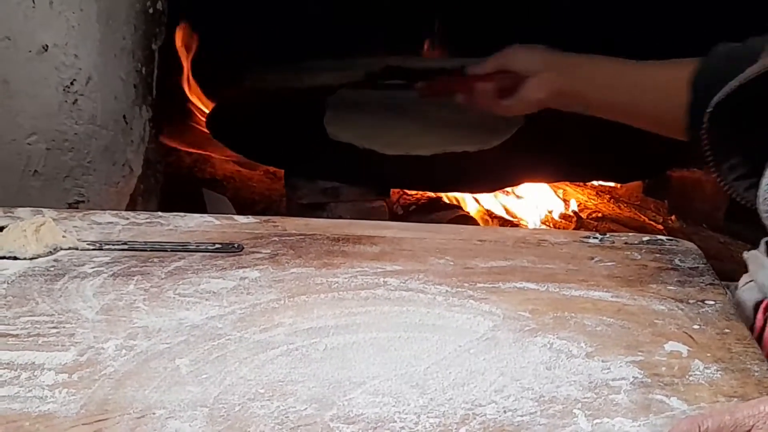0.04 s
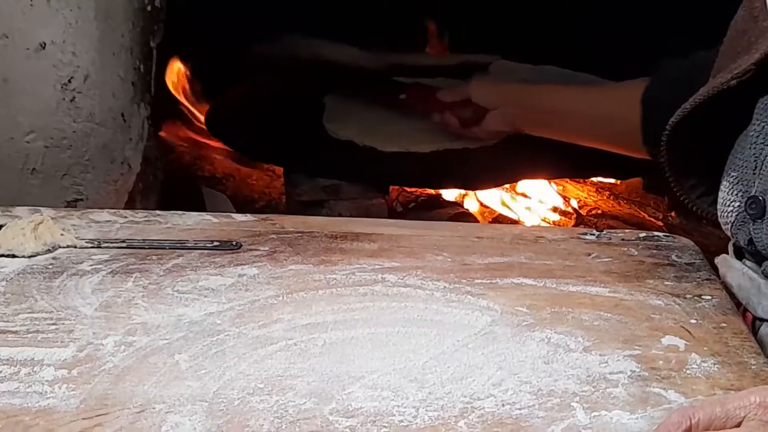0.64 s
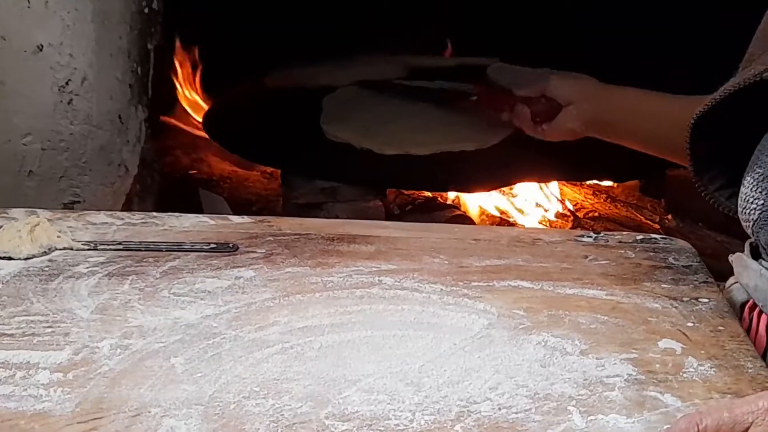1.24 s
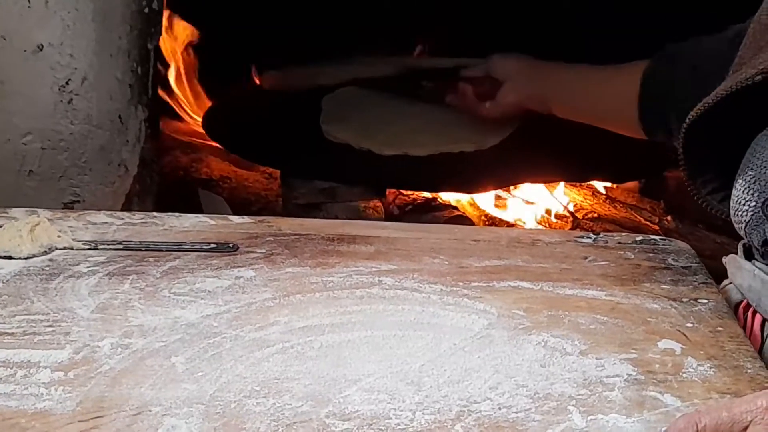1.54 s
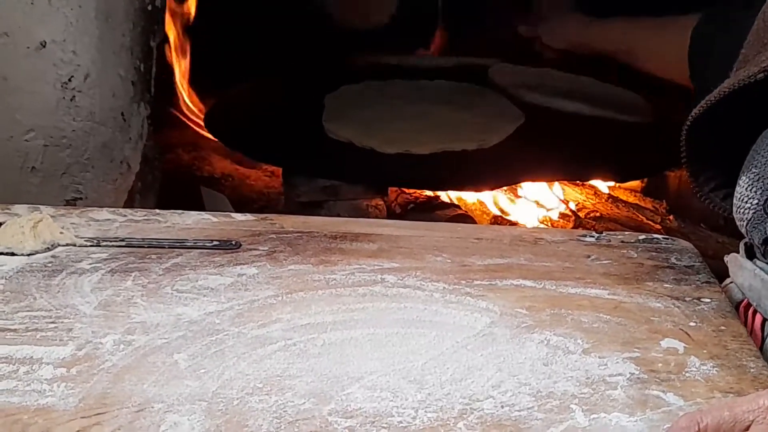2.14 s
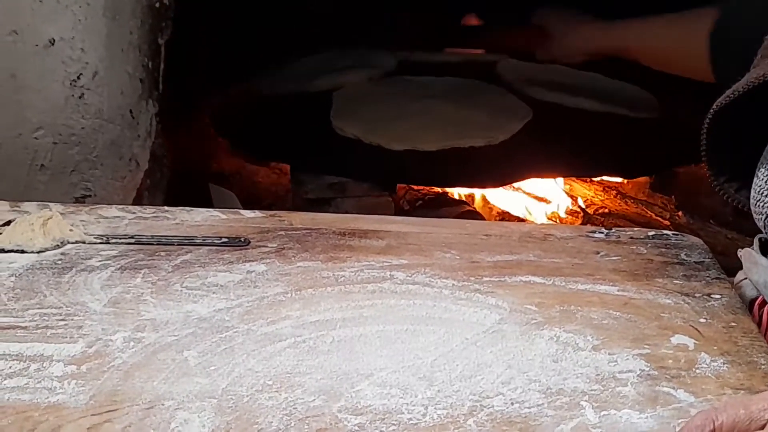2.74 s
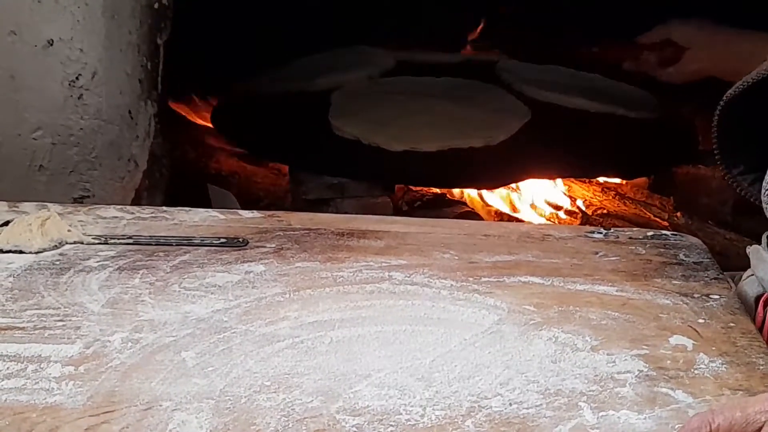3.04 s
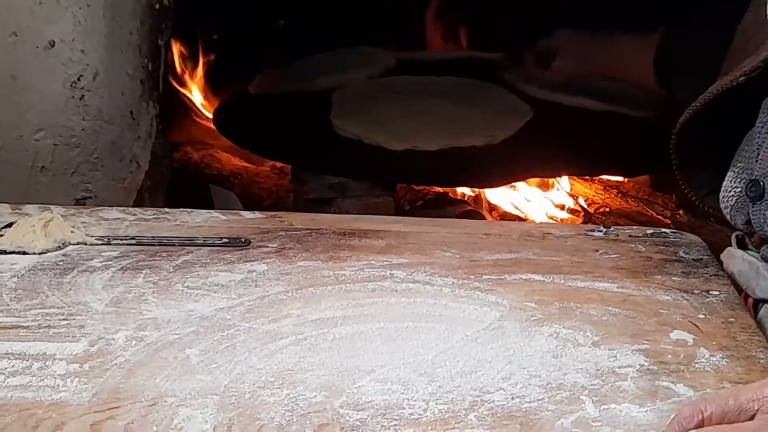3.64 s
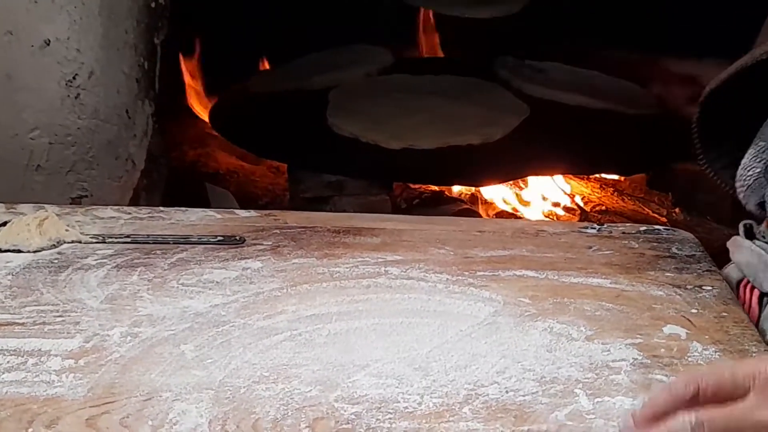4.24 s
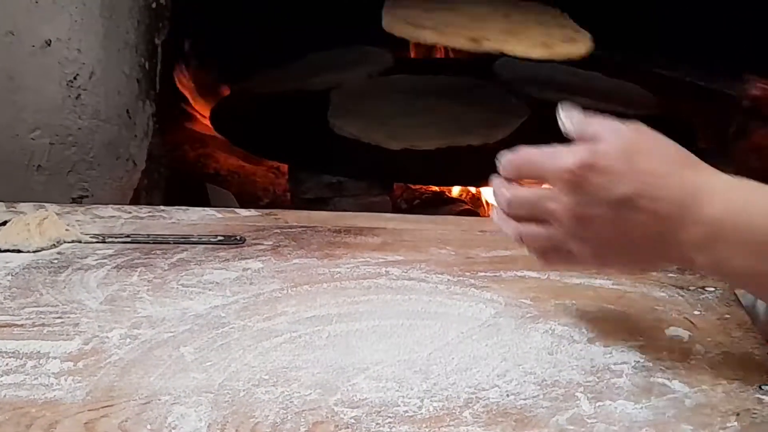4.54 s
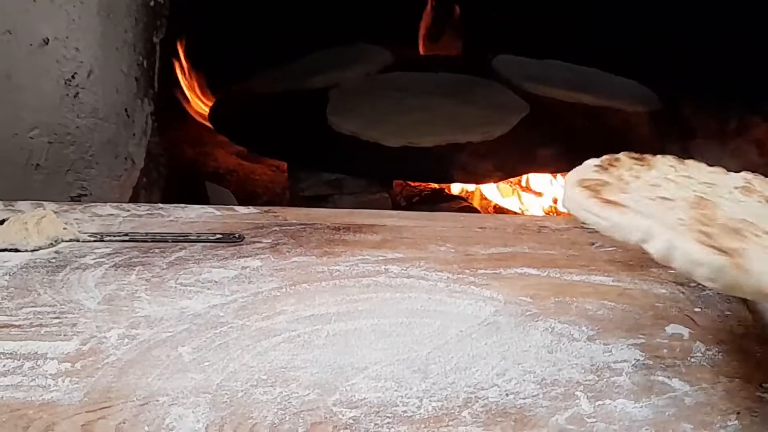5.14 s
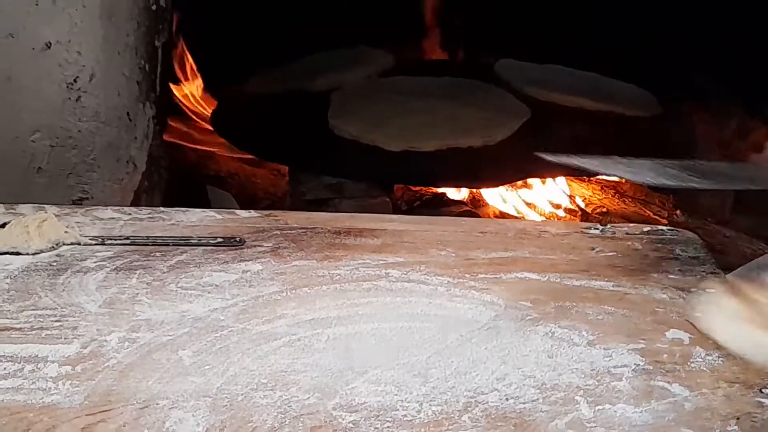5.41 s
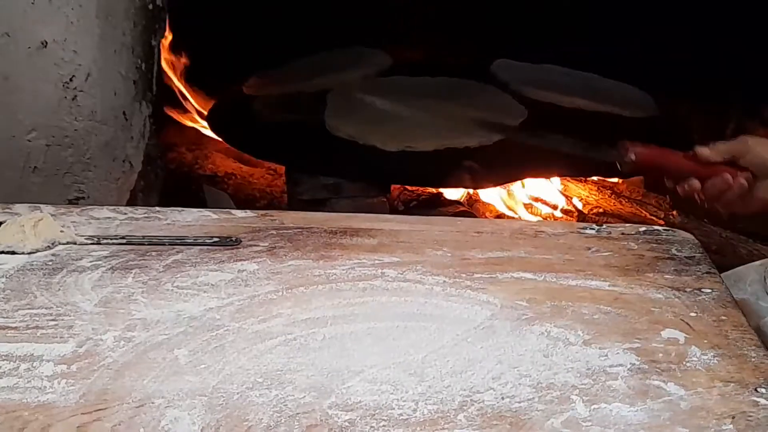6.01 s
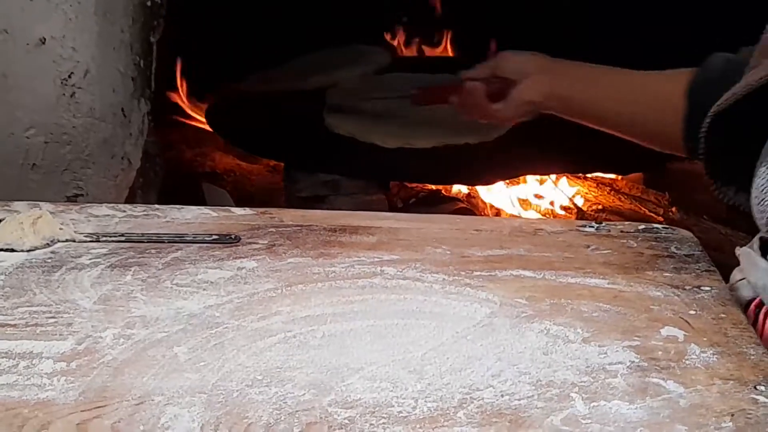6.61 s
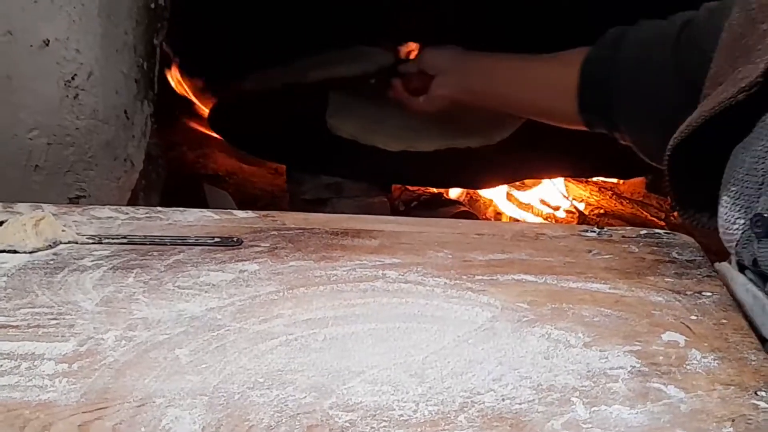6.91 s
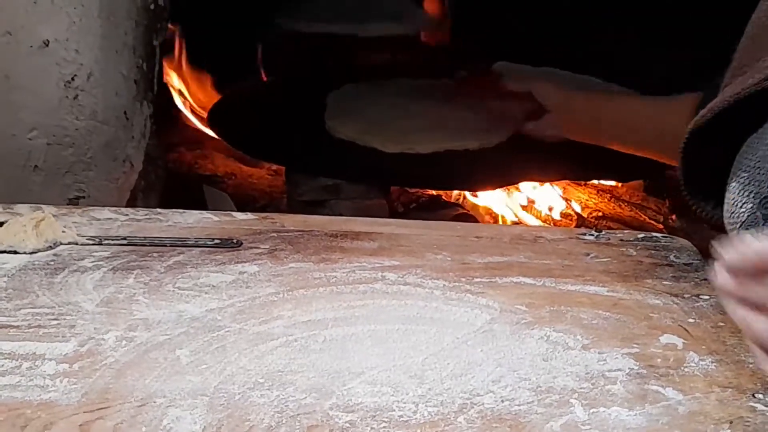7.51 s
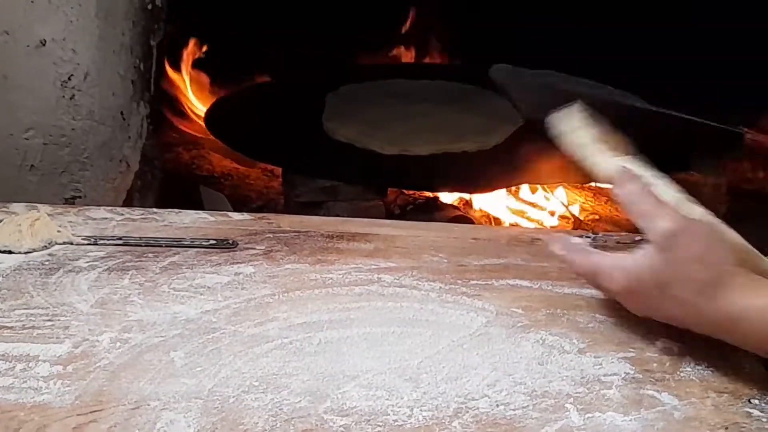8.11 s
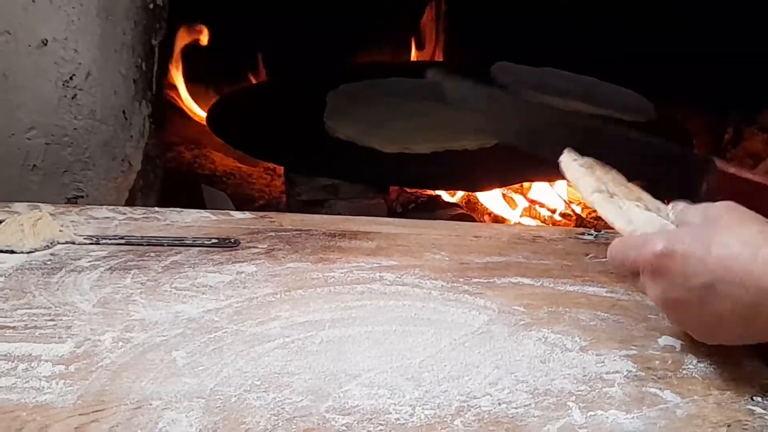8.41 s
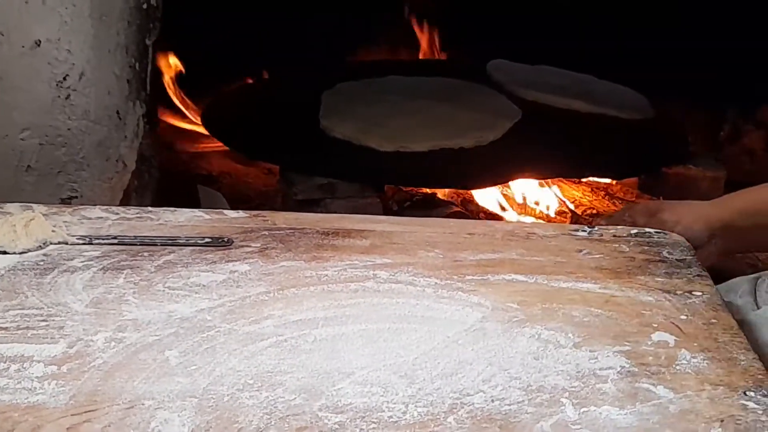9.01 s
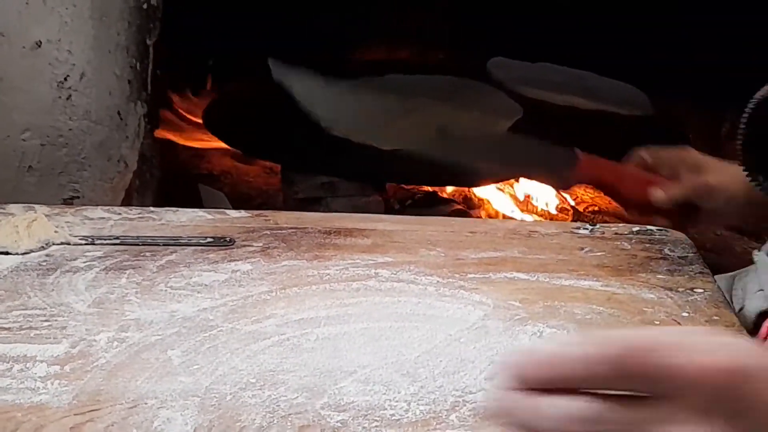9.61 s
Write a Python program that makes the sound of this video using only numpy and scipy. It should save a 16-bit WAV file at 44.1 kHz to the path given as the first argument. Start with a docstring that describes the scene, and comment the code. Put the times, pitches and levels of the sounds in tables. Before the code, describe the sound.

In a small kitchen, a long knife scrapes in short gritty strokes across an iron griddle, making the metal ring. Hands rub over floury bread and slap it down with a soft wooden thud. More scraping follows, firmest past the middle, then light crust clicks, and finally dough thuds on a board with a brisk rub. A wood fire hisses faintly behind, and everything sounds close with a short echo.

```python
"""In a small kitchen, flatbreads bake on an iron griddle over a wood fire.
A long knife scrapes under the loaves; it catches and slips, so grit hisses and the metal rings.
Hands rub over flour and slap bread and dough onto a wooden board, which thuds and hums.
Knife, crust and fingers add small clicks, and the walls throw back a short echo.
Behind it all the fire softly hisses, mutters and crackles."""
import sys
import numpy as np
from scipy import signal
from scipy.fft import rfft, irfft, next_fast_len
from scipy.io import wavfile
from scipy.ndimage import map_coordinates

SR = 44100
rng = np.random.default_rng(int(sys.argv[2]) if len(sys.argv) > 2 else 0)


def unload_audio(sound):
    """Save the sound as a 16-bit wav file, at the path given as the first command line argument."""
    columns = np.transpose(np.atleast_2d(sound))
    # keep every value between -1 and 1, then stretch to whole-number steps
    steps = np.round(np.clip(columns, -1, 1) * 32767)
    wavfile.write(sys.argv[1], SR, steps.astype(np.int16))


N = 429968

# Levels are relative. A fade is the time to drop by 60 dB. Pan is the left level minus the right.
# knife strokes on the griddle, then at its far rim:
# (start [s], push [s], hold [s], fade [s], grit [dB], rasp [dB], ring [dB], pan [dB])
GRIDDLE_STROKES = [ (0.224, 0.024, 0.0054, 0.15, -51.5, -57, -44, -2.5),
                   (0.293, 0.014, 0.024, 0.35, -51.5, -59, -55, -1),
                   (0.359, 0.02, .01, 0.19, -42, -50, -47, -1),
                   (0.392, 0.029, 0.019, 0.77, -53, -58, -56.5, -6),
                   (0.844, .018, 0.046, 0.36, -47.5, -49, -50, -1.5),
                   (0.990, .05, .025, .22, -56, -53.5, -53.5, -1.5),
                   (1.144, 0.053, 0.076, 0.46, -60.5, -63, -63.5, -0.5),
                   (1.310, 0.15, 0.093, 0.5, -41.5, -47, -64, 0),
                   (1.500, .10, .045, 0.61, -64.5, -66, -56.5, -2),
                   (6.623, 0.0063, 0.03, 0.17, -42.5, -51, -45.5, -2),
                   (6.686, .025, 0.026, 0.32, -43, -50, -48.5, -1),
                   (6.702, 0.078, 0.0449, .6, -36, -43.5, -38.5, -0.5),
                   (6.800, 0.081, 0.082, 0.6, -37.5, -41, -43.5, -1),
                   (7.189, 0.069, 0.031, 0.78, -63, -66, -62.5, -2)]
RIM_STROKES = [ (0.000, 0.043, 0.095, 0.58, -68.5, -65, -63.5, -6),
               (3.289, 0.0085, 0.096, .55, -56.5, -61.5, -49, -2),
               (3.360, 0.13, 0.073, 0.61, -46.5, -49, -59, -1.5),
               (3.560, 0.081, .065, .36, -47.5, -43.5, -45.5, -1.7),
               (3.835, 0.035, 0.013, 0.34, -63, -61, -58.5, -2)]
# one loaf sliding on the lifted blade, same columns; its negative fade cuts the hold short
LOAF_SLIDE = (6.5, 1.12, 0.45, -0.5, -70.5, -68, -69, -9.5)
# hands on floury bread: (start [s], push [s], hold [s], fade [s], hiss [dB], body [dB], pan [dB])
HAND_RUBS = [ (2.123, 0.059, .01, 0.31, -58, -63.5, -2.5), (2.309, .018, 0.053, .1, -42, -44.5, -1.5),
             (2.500, 0.041, 0.057, .7, -61, -76, -1), (2.690, 0.036, 0.0052, 0.22, -60, -62.5, -4),
             (4.874, .009, .012, 0.45, -52.5, -55, -0.5), (5.047, .1, 0.039, 0.54, -49.5, -51, -1.2),
             (5.739, 0.048, 0.0049, .25, -48.5, -59.5, -3), (6.140, 0.029, 0.057, .13, -49, -49, -3.5),
             (8.375, 0.033, 0.023, 0.77, -52, -52.5, -1.5), (8.505, 0.039, .1, 0.39, -55, -53.5, -2.5),
             (8.664, 0.032, .008, 0.24, -51.5, -47.5, -2), (8.738, .04, 0.074, .3, -63.5, -64, -6),
             (8.985, 0.063, 0.011, 0.17, -45, -53.5, -2.5), (9.443, 0.037, .02, 0.28, -31.5, -40, -3),
             (9.530, 0.051, 0.013, 0.41, -34.5, -42, -4.5)]
# soft blows of bread, dough and palm: (time [s], smack [dB], swell [s], fade [s],
# brightness [dB per octave], thud [dB], board ring [dB], favoured pitch [Hz], pan [dB])
DOUGH_SLAPS = [(2.3809, -23, 0.0052, 0.066, -4, -34.5, -29.5, 77, 0),
               (2.405, -36, 0.0018, 0.23, -7.5, -35, -32, 120, -3),
               (6.0376, -28, 0.026, 0.21, 1.7, -30, -30.5, 232.4, -3),
               (8.056, -37.5, 0.023, 0.3, -0.2, -39, -38.5, 110, -1),
               (8.1129, -27.5, 0.001, 0.06, -1.5, -61, -51, 113.5, -1),
               (8.118, -34.5, 0.031, 0.057, 0.5, -54, -41, 118, -1.5),
               (8.386, -69, 0.011, 0.26, 2, -58, -52, 116, 3.5),
               (9.3028, -25, 0.015, 0.21, 2, -21, -27.5, 132, -4),
               (9.331, -30.5, 0.0037, 0.11, 1.5, -32.5, -19.5, 161.5, 0),
               (9.446, -39, 0.0069, 0.62, 5, -51, -37, 114, -2.5)]
# clicks of knife, crust and fingers: (time [s], level [dB], pitch [Hz], treble [dB], fade [s], pan [dB])
CLICKS = [ (0.1918, -34, 1920, -9, 0.025, -3.5), (0.3689, -48, 4000, -14, 0.056, 1),
          (0.456, -38.5, 4980, 15, 0.032, 2.5), (0.8282, -53, 1820, -10, .17, -3),
          (0.8522, -30, 7100, -5, .045, -1), (1.0674, -45, 1670, 8, .015, -6),
          (1.2355, -55.5, 1910, 21, 0.12, -3), (2.3835, -21, 3530, -3, 0.053, -0.5),
          (2.66, -54.5, 445, -33, .049, -4.5), (2.7876, -56, 2980, 13, 0.14, -3),
          (2.9148, -49.5, 3020, 11, 0.1, -3.5), (3.533, -39, 2020, -1, 0.067, -2),
          (4.879, -61, 1300, 11, 0.1, 0), (5.6302, -58, 5900, -6.5, .055, -8),
          (6.428, -48.5, 5440, 3.5, 0.1, -3.5), (6.6834, -35, 1720, -40, 0.0084, -11.5),
          (7.2427, -47.5, 9400, -6, 0.027, -1), (7.8207, -55, 3000, 17, 0.032, -2),
          (7.838, -56, 6100, 5, 0.099, 2), (7.8677, -51, 700, 16, .14, 2),
          (8.0488, -31, 1330, -21, 0.022, -2), (8.1147, -36.5, 4080, -7, 0.2, -2),
          (8.3847, -38, 750, -3, .05, -3), (8.9156, -47.5, 4360, 12, 0.15, -7)]
# the knife bumps the griddle: (time [s], swell [s], fade [s], level [dB])
GRIDDLE_NUDGES = [(0.189, .04, 0.63, -60), (0.835, 0.12, 1.6, -60.5)]

# notes of the metal, low for a ring and higher for a rasp: (pitch [Hz], width [Hz], level [dB])
GRIDDLE_RING = [(129.7, 144, -21), (282, 50, -10.5), (500, 440, -18.5), (746, 120, -6.5), (943, 120, -7.5),
                (1030, 190, -10.5), (1243, 180, -10.5)]
GRIDDLE_RASP = [(1514, 460, -1), (1670, 150, 4), (1962, 200, 5), (2157, 150, 6), (2645, 150, 0.5)]
RIM_RING = [(111, 160, -21.5), (294, 130, -17.5), (483, 180, -11.5), (709.5, 210, -6.5), (990, 150, -11),
            (1300, 80, -16.5)]
FAR_RIM_RASP = [(1417, 90, 0), (1606, 100, -5.5), (1660, 70, -4), (1970, 340, -2.5), (2424, 270, 0),
                (2620, 220, -3.5), (3160, 82, 2)]
SLIDE_RING = [(109, 60, -10), (274, 51, 4), (534, 150, -9), (756, 100, -14)]
SLIDE_RASP = [(1356, 180, 3), (1800, 230, -0.5), (2080, 2300, -5.5)]
BLADE_NOTES = [(3720, 200, 5), (4450, 190, -10.5), (5000, 200, -2), (5980, 210, 5), (6980, 620, 1),
               (10760, 430, -1), (12600, 450, -8)]
# notes of the board, muffled by the dough on it: (pitch [Hz], level [dB], fade [s])
BOARD_NOTES = [(61, -13, 0.47), (88.4, -3.5, 0.42), (106.9, -2, 0.23), (129.8, 0.5, 0.24),
               (163.2, -4.5, 0.33), (252.4, -5, 0.17), (271, -14.5, 0.15), (340.8, -5.5, 0.2),
               (370.5, -8, 0.12), (430.4, -16.5, .24), (507, -15, .28), (514, -24, .28), (611, -12, .26),
               (750, -21, 0.24)]

# the colour of each noise, or how strong it is from bass to treble: (frequency [Hz], level [dB])
GRIT_COLOUR = [(30, -47), (110, -12), (220, -11), (600, -0.5), (1400, -1), (2800, 2), (4200, 6.5),
               (6500, 1), (8800, -5), (12000, 1.5), (16000, -7)]
FLOUR_COLOUR = [(100, -29), (700, -23.5), (1600, -2), (2700, -0.5), (4200, 0), (6500, -0.5), (8800, -10.5),
                (12000, -4.5), (16000, -17.5)]
RUB_COLOUR = [(30, -16), (110, 1), (200, -13), (320, -4), (480, 0), (750, -2), (1200, -6.5), (2000, -7),
              (5000, -36)]
SMACK_COLOUR = [(40, -9), (250, -8), (600, 1), (1000, -3), (1900, -1.5), (3000, -7.5), (4200, -6),
                (6500, -6), (8800, -18.5), (12000, -12), (16000, -27)]
THUD_COLOUR = [(30, -41.5), (55, -21), (85, -8), (130, 2), (200, -11), (300, -4.5), (550, -11.5),
               (1000, -18.5), (3000, -30.5), (9000, -67)]
FIRE_COLOUR = [(15, -45), (25, -15.5), (64, 1.5), (87, -1), (141, -1), (200, -15.5), (249, -7.5),
               (373, -13.5), (416, -11.5), (451, -7), (1070, -20.5), (2760, -10.5), (9570, -13.5),
               (12200, -10.5), (16000, -13.5)]

# how alike left and right sound: (frequency [Hz], likeness [0-1])
LIKENESS = [(150, .97), (280, .88), (500, .72), (900, .35), (1300, .08), (3000, 0)]
# how the fire, then the whole sound, leans to one side: (frequency [Hz], pan [dB])
FIRE_PAN = [(100, -2.5), (500, -2.5), (1500, -1.5), (6000, -2), (14000, -3)]
OVERALL_PAN = [(100, -1.5), (1000, 0), (6000, -1), (7200, 1.5), (8700, 7.5), (11000, 5), (14000, 11)]
# echoes off board, griddle and hearth wall: (left delay [s], right delay [s], gain [ratio])
NEAR_ECHOES = [(.00109, 0.0012, 0.046), (.00132, 0.0011, 0.035), (.00159, 0.0018, -0.16),
               (.00231, 0.0032, -0.28), (.0046, 0.0035, .16), (.0071, 0.0091, 0.3)]
# how long the kitchen rings on: (frequency [Hz], fade [s])
ROOM_FADES = [(100, 0.62), (500, 0.37), (2000, 0.34), (6000, 0.18), (15000, 0.18)]


def knife_scrape(row, ring_notes, rasp_notes, grit_db, rasp_db, ring_db):
    """The blade catches and slips on baked-on flour, and sets steel and iron ringing."""
    *timing, grit, rasp, ring, pan = row
    t, speed_db = stroke(*timing)
    grit += 1.25 * speed_db  # the hiss needs speed
    rasp += speed_db
    ring += 0.91 * speed_db  # the low ring lingers
    bright = lambda hz: np.hypot(colour(GRIT_COLOUR)(hz), ringing(BLADE_NOTES)(hz))
    x = amp(grit + grit_db) * friction(len(t), bright, grain_db=1.5)
    # the contact point travels along the blade, bending the rasp's pitch
    travel = np.cumsum(1 + .03 * wander(t, per_s=7))
    steady_rasp = friction(2 * len(t), ringing(rasp_notes), grain_db=3.5)
    bent_rasp = np.array([map_coordinates(side, [travel], order=3) for side in steady_rasp])
    x += amp(rasp + rasp_db) * bent_rasp
    x += amp(ring + ring_db - 4.5) * friction(len(t), ringing(ring_notes), grain_db=3, direct=.7)
    # under a firm stroke the low notes stay in step from slip to slip, and so sing
    song = 0
    for hz, _, db in ring_notes:
        strength = amp(db + 2.5 * wander(t, per_s=20))
        song += strength * np.sin(2 * np.pi * hz * t + .8 * wander(t, per_s=20))
    firmness = np.clip((ring + 68) / 16, 0, 1)
    x += amp(ring + ring_db - 1.5) * firmness * song
    flicker = amp(wander(t, per_s=120))
    return t[0], x * sides(pan) * flicker


def dough_slap(start, smack_db, swell, fade, tilt_db, thud_db, ring_db, main_hz, pan):
    """A soft lump lands bit by bit: its skin smacks, its weight thuds and the board rings."""
    t = np.arange(int(.8 * SR)) / SR
    tilted = lambda hz: amp(read(SMACK_COLOUR, hz) + tilt_db * np.log2((hz + 300) / 2000))
    smack = amp(smack_db) * friction(len(t), tilted, grain_db=1.5) * blow(t, swell, fade)
    thud = amp(thud_db) * friction(len(t), colour(THUD_COLOUR)) * blow(t, swell, fade=.2)
    ring = 0
    for hz, db, note_fade in BOARD_NOTES:
        # where the lump lands decides which notes are strong
        favour_db = 10 * np.exp(-(np.log2(hz / main_hz) / 0.3) ** 2) - 5
        ring += amp(db + favour_db) * blow(t, swell, note_fade) * np.sin(2 * np.pi * hz * t)
    return start, low_cut(smack + thud + amp(ring_db) * ring, hz=52) * sides(pan)


def hand_rub(row):
    """Skin and crust slide over flour: a fine hiss above a dull body of sound."""
    *timing, hiss_db, body_db, pan = row
    t, speed_db = stroke(*timing)
    hiss = friction(len(t), colour(FLOUR_COLOUR), grain_db=1.5)
    body = friction(len(t), colour(RUB_COLOUR), grain_db=3, direct=0.69)
    x = amp(hiss_db + 0.92 * speed_db - 4.5) * hiss
    x += amp(body_db + 0.95 * speed_db - 5) * body
    flicker = amp(0.88 * wander(t, per_s=69))
    return t[0], x * sides(pan) * flicker


def click(start, db, peak_hz, treble_db, fade, pan):
    """Hard things touch: a brief crack around one pitch, then a faint rattle."""
    t = np.arange(int(.3 * SR)) / SR
    peak = ringing([(peak_hz, 1.5 * peak_hz, 0)])
    gain = lambda hz: peak(hz) + amp(treble_db + read(SMACK_COLOUR, hz) - 2)
    crack = blow(t, swell=0.00014, fade=fade)
    rattle = amp(-26.5) * blow(t, swell=0.0061, fade=0.45)
    return start, amp(db) * friction(len(t), gain, grain_db=4.5) * (crack + rattle) * sides(pan)


def griddle_nudge(start, swell, fade, db):
    """The heavy griddle rocks on its stand with a dull rumble."""
    t = np.arange(0, swell + fade / 2, 1 / SR)
    rumble = amp(db) * friction(len(t), colour(THUD_COLOUR)) * blow(t, swell, fade)
    return start, low_cut(rumble, hz=60)


def wood_fire():
    """Burning wood gives a wavering hush, a low mutter and faint crackles."""
    t, hz = np.arange(N) / SR, np.fft.rfftfreq(N, 1 / SR)
    hush = friction(N, colour(FIRE_COLOUR), direct=0.45)
    hush = irfft(rfft(hush) * sides(read(FIRE_PAN, hz)), N)
    x = hush * amp(-64 + .4 * wander(t, per_s=4.9))
    for when, size, pitch in rng.random((20, 3)):
        crackle = click(when * N / SR, -70 + 7 * size, 2000 + 5000 * pitch, -11, fade=.015, pan=-3)
        add(x, *crackle)
    return x


def near_echoes(x):
    """The nearest hard surfaces throw the higher sounds straight back."""
    hz = np.fft.rfftfreq(N, 1 / SR)
    paths = sum(gain * np.exp(-2j * np.pi * hz * np.array([[left], [right]]))
                for left, right, gain in NEAR_ECHOES)
    return low_cut(irfft(rfft(x) * paths, N), hz=947)


def kitchen_echo(x):
    """Many echoes from walls and hearth blur into one tail; the treble dies first."""
    noise = friction(int(.7 * SR), np.ones_like)
    hz, t, bands = signal.stft(noise, SR, nperseg=256)
    fading = amp(-60 * t / np.maximum(read(ROOM_FADES, hz), .02)[:, None])
    _, tail = signal.istft(bands * fading, SR, nperseg=256)
    tail *= np.minimum(np.arange(tail.shape[1]) / SR / 0.016, 1)  # builds up over 16 ms
    return signal.fftconvolve(x, tail / np.linalg.norm(tail[0]), axes=1)[:, :N]


def friction(size, gain, grain_db=0, direct=1):
    """Countless tiny, uneven contacts make noise; the more direct, the more alike left and right."""
    n = next_fast_len(size + 2048)
    force = amp(grain_db * np.repeat(rng.standard_normal(n // 32 + 1), 32)[:n])
    shared, apart = rfft(rng.standard_normal((2, n)) * force)
    hz = np.fft.rfftfreq(n, 1 / SR)
    likeness = np.clip(direct * read(LIKENESS, hz), -1, 1)
    mid, side = shared * np.sqrt(1 + likeness), apart * np.sqrt(1 - likeness)
    x = irfft(np.array([mid + side, mid - side]) * gain(hz), n)[:, :size]
    return x / np.sqrt(np.mean(x.mean(0) ** 2) + 1e-20)


def stroke(start, push, hold, fade, sag_db_per_s=9.5):
    """A stroke speeds up, slackens a little, then coasts; gives its times and its speed in dB."""
    t = np.arange(0, push + hold + .65 * fade, 1 / SR)
    speeding = np.sin(np.pi / 2 * np.minimum(t / push, 1)) ** 1.37
    sag_db = sag_db_per_s * np.clip(t - push, 0, hold)
    coast_db = 60 * np.maximum(t - push - hold, 0) / fade
    return start + t, 20 * np.log10(speeding + 1e-6) - sag_db - coast_db


def blow(t, swell, fade):
    """The strength of a hit: contact spreads during the swell, then dies away."""
    rise = np.minimum(t / swell, 1) ** 0.59
    return rise * amp(-60 * np.maximum(t - swell, 0) / fade)


def ringing(notes):
    """A gain curve with a steep-sided peak at each note."""
    return lambda hz: np.sqrt(sum((amp(db) / (1 + ((hz ** 2 - pitch ** 2) / (width * hz + 1)) ** 2)) ** 2
                                  for pitch, width, db in notes))


def colour(points):
    """The gain curve of a colour table."""
    return lambda hz: amp(read(points, hz))


def wander(t, per_s):
    """A random drift, mostly between -1 and 1."""
    knots = rng.standard_normal(4096)
    return np.interp((t - t[0]) * per_s, np.arange(len(knots)), knots)


def low_cut(x, hz):
    """Turns down what lies below hz."""
    return signal.sosfilt(signal.butter(2, hz, "high", fs=SR, output="sos"), x)


def amp(db):
    """Decibels to gain."""
    return 10 ** (np.asarray(db) / 20)


def read(points, hz):
    """A table's value at hz, gliding between its rows on a pitch scale."""
    row_hz, value = np.transpose(points)
    return np.interp(np.log(hz + 1), np.log(row_hz + 1), value)


def sides(pan):
    """Left and right gains for a pan in dB."""
    return amp(np.array([[.5], [-.5]]) * pan)


def add(mix, start, sound):
    """Mixes a sound in at a start time in seconds."""
    part = mix[:, max(round(start * SR), 0):][:, :sound.shape[1]]
    part += sound[:, :part.shape[1]]


def scene():
    """Knife, hands and bread with their echoes, over the fire."""
    work = np.zeros((2, N))
    for row in GRIDDLE_STROKES:
        add(work, *knife_scrape(row, GRIDDLE_RING, GRIDDLE_RASP, grit_db=-2, rasp_db=-1, ring_db=-1.5))
    for row in RIM_STROKES:
        add(work, *knife_scrape(row, RIM_RING, FAR_RIM_RASP, grit_db=-0.3, rasp_db=-7.5, ring_db=-1))
    add(work, *knife_scrape(LOAF_SLIDE, SLIDE_RING, SLIDE_RASP, grit_db=-2.5, rasp_db=0.5, ring_db=-1.5))
    for row in DOUGH_SLAPS:
        add(work, *dough_slap(*row))
    for row in HAND_RUBS:
        add(work, *hand_rub(row))
    for row in CLICKS:
        add(work, *click(*row))
    for row in GRIDDLE_NUDGES:
        add(work, *griddle_nudge(*row))
    room = amp(-12) * kitchen_echo(low_cut(work, hz=170))
    return work + near_echoes(work) + room + wood_fire()


def record(dry):
    """The high treble leans to the left, and the very top is cut off."""
    hz = np.fft.rfftfreq(N, 1 / SR)
    x = irfft(rfft(dry) * sides(read(OVERALL_PAN, hz)), N)
    top_cut = signal.firwin(511, cutoff=16150, window=("kaiser", 9), fs=SR)
    return signal.oaconvolve(x, top_cut[None], "same")


dry = scene()
out = record(dry)
unload_audio(out)
```